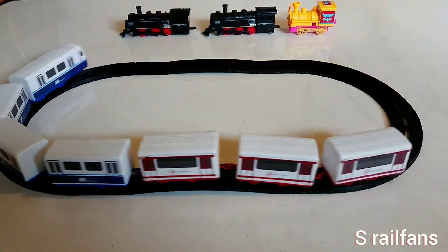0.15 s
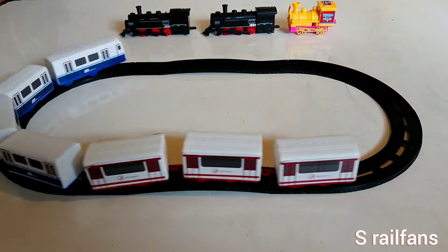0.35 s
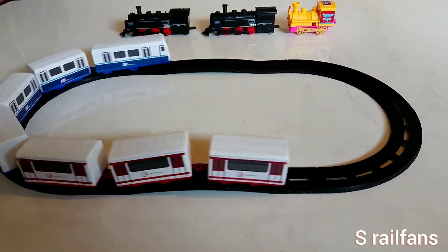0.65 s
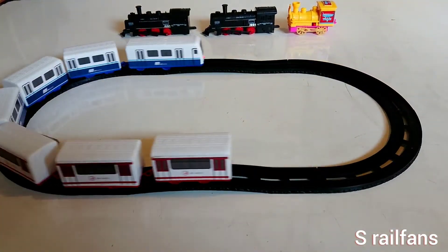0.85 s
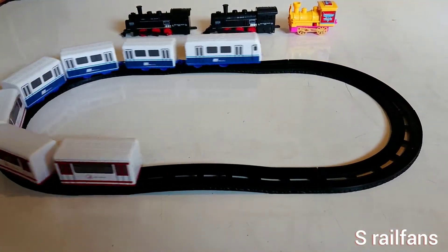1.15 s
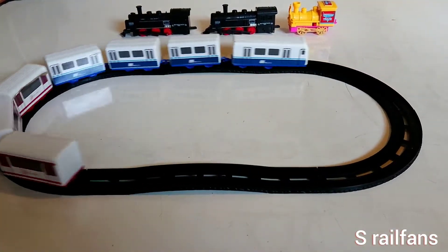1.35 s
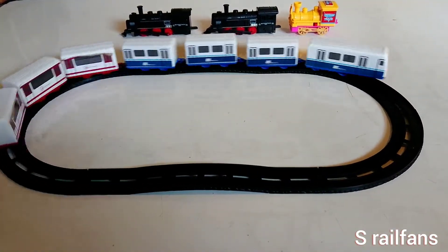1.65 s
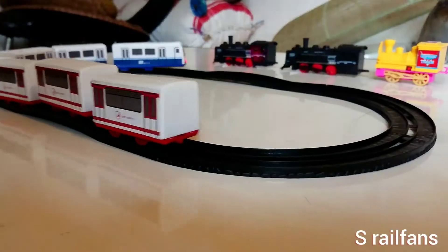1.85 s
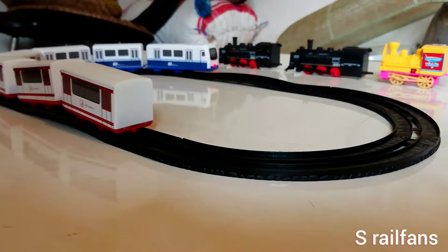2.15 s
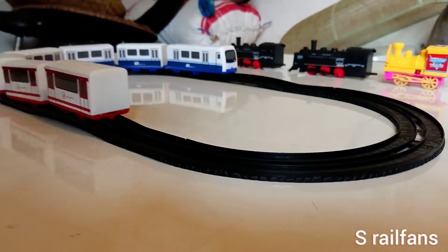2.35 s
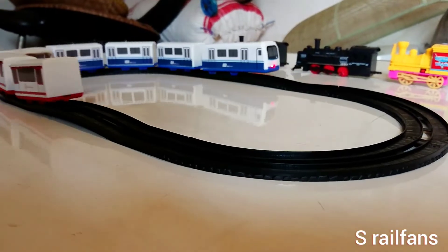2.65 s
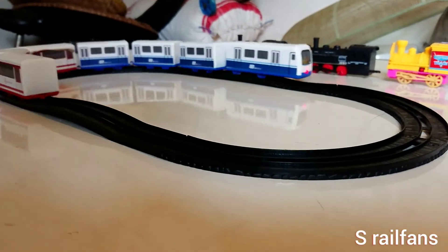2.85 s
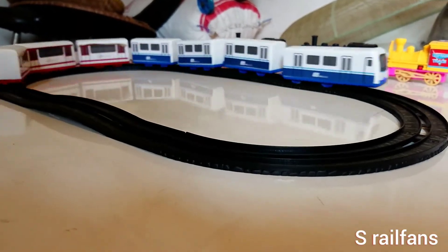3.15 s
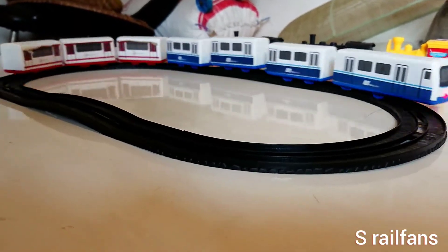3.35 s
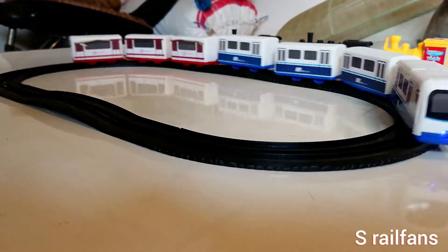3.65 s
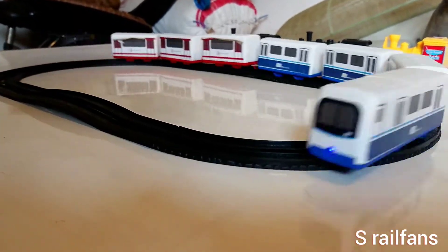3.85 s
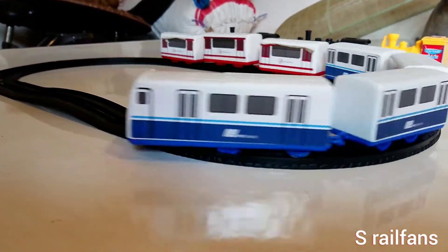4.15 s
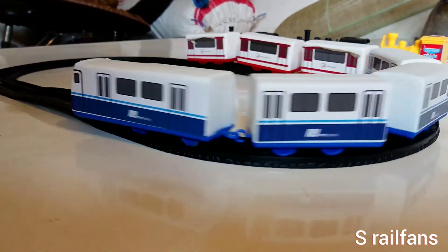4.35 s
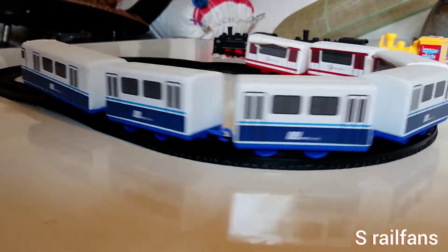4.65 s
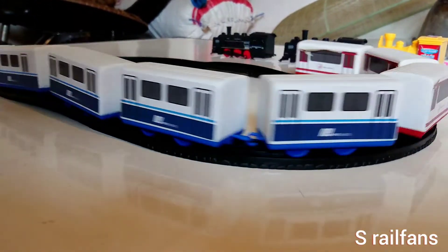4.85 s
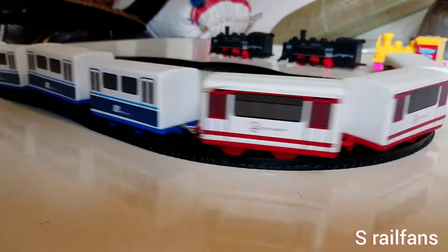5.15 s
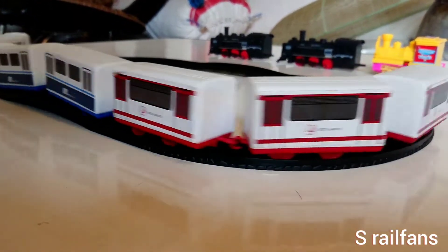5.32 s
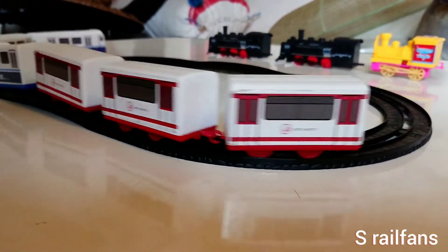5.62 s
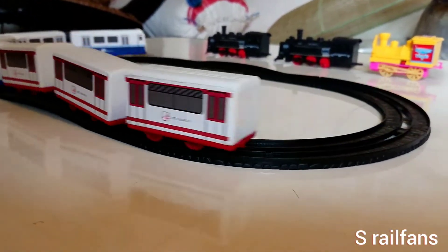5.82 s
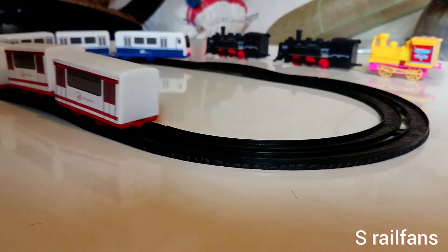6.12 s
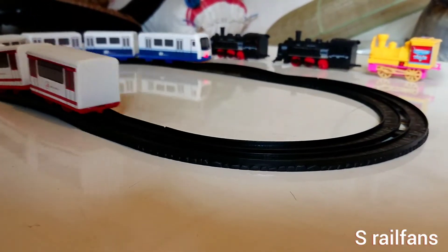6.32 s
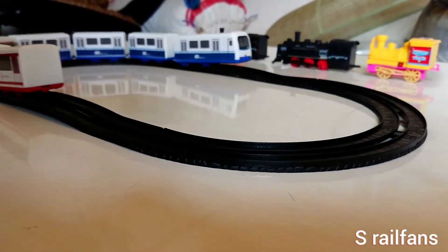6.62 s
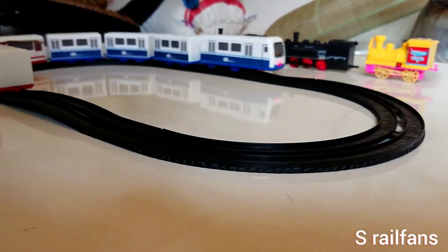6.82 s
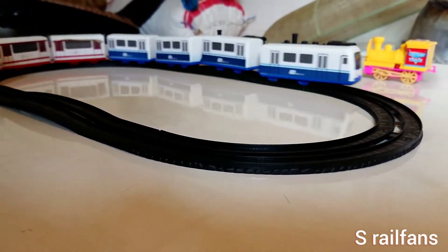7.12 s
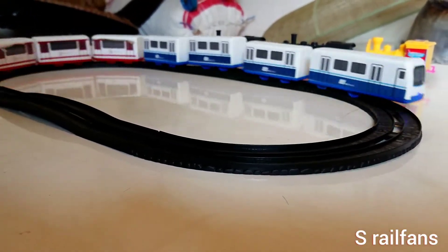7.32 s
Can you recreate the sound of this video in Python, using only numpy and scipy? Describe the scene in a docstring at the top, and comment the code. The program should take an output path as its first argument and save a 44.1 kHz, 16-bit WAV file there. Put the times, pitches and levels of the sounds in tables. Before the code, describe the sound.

A battery toy train runs without pause on a plastic track over a hard table. Dry wheel and gear chatter, hollow wagon-shell rattle and irregular joint clacks fill the foreground. After a blink-short dip near two seconds the colour changes and the table rumbles more; the clatter swells loudest around four seconds, eases, then returns at the end. Close stereo phone pickup, leaning right, quiet room with faint hum.

```python
"""Toy train on a hard table

A battery toy train runs on a plastic track, close to a phone with two microphone ports.
Filtered noise makes wheel and gear chatter, hollow shell ring, axle clacks over joints and table rumble;
damped sines add ticks and struck shell walls, wandering sines an appliance's hum over low room air.
The train is heard from above; at 1.72 s the level dips briefly, then the viewpoint is low: the chatter
has another colour and the table rumbles more.
"""
import sys
import numpy as np
from scipy import signal
from scipy.fft import rfft, irfft, next_fast_len
from scipy.io import wavfile
from scipy.ndimage import uniform_filter1d

SR = 44100
rng = np.random.default_rng(int(sys.argv[2]) if len(sys.argv) > 2 else 0)


def put_to_file(sound):
    """Save the sound as 16-bit audio at rate SR, in the file named by the first command-line argument."""
    columns = np.atleast_2d(sound).T  # one column per channel
    safe = np.clip(columns, -1, 1)
    whole_steps = np.round(safe * 32767)
    wavfile.write(sys.argv[1], SR, whole_steps.astype(np.int16))


def attenuation_scalar(level_db):
    """Turn a level in dB into a linear amplitude multiplier (20 dB per decade)."""
    decades = np.asarray(level_db, float) / 20
    return 10 ** decades


N = 329868
T = np.arange(N) / SR
M = next_fast_len(N)
HZ = np.maximum(np.arange(M // 2 + 1) * SR / M, 1)

# Table levels are relative: each source's function adds its own offset. Spectra give shape only.
# how near the train is heard: (time [s], shell ring [dB], wheel chatter [dB])
NEARNESS = [(0, -25.5, -31.5), (.13, -27, -32), (.22, -27.5, -32), (.35, -27.5, -29.5), (.5, -31, -38),
            (.75, -31.5, -38.5), (.95, -29.5, -35), (1.15, -31.5, -36), (1.3, -27.5, -34.5),
            (1.5, -28.5, -34.5), (1.7, -25.5, -33), (1.74, -31, -34), (1.85, -31, -32.5), (1.95, -35, -42),
            (2.3, -35, -42), (2.6, -32, -38), (2.97, -32.5, -36.5), (3.06, -29, -35.5), (3.2, -28.5, -37),
            (3.32, -26, -35), (3.45, -29.5, -35.5), (3.63, -24.5, -34.5), (3.76, -27, -34.5),
            (3.9, -25.5, -33.5), (4.3, -27, -33.5), (4.45, -24.5, -32), (5.1, -22.5, -31.5),
            (5.4, -25, -32), (5.95, -29.5, -35.5), (6.15, -32.5, -41), (6.45, -32, -38.5),
            (6.92, -31.5, -37.5), (7.03, -28.5, -35), (7.15, -30, -36), (7.36, -25.5, -33),
            (7.48, -31, -36)]
# axles over track joints and couplings knocking:
# (time [s], level [dB], shell ring against it [dB], sharpness [dB])
JOINT_CLACKS = [(0.093, -30, 1, -19), (0.1026, -28.5, 2, -3.5), (0.1486, -20.5, -8, -5),
                (0.232, -39, 4, -12), (0.268, -14.5, 1, -6), (0.307, -24.5, -4, -4), (0.335, -33, -5, -5),
                (0.3521, -24, 2, -6), (0.4364, -33, -4, -5), (0.4544, -23.5, -12, -6.5),
                (0.544, -25, 6, -7), (0.699, -21, 12, -13), (0.91, -18, -2, -17), (0.9368, -20, -6, -13),
                (0.954, -29.5, -8, -4.5), (1.0221, -29, -1, -6), (1.05, -19, 1, -19), (1.0825, -32, 8, -15),
                (1.103, -38, 6, -15), (1.2414, -28, 10, -6), (1.32, -18, 6, -8.5), (1.389, -36, 5, -17),
                (1.5, -22, 15, -19), (1.5405, -25, 3, -6.5), (1.572, -20, 1, -13), (1.7854, -13, 3, -9),
                (1.792, -18, 0, -10), (1.8254, -14, 1, -6.5), (1.829, -21, 0, -9), (2.001, -14, -5, -8.5),
                (2.095, -16.5, 10, -14), (2.1036, -13, -10, -12), (2.117, -17, -11, -8.5),
                (2.134, -16, 3, -11), (2.177, -15, -5, -12), (2.185, -16.5, -14, -8),
                (2.5576, -21, -6, -16), (2.583, -18, -9, -13), (2.613, -23, -6, -9), (2.627, -14, -1, -13),
                (2.6463, -19, -12, -19), (2.696, -16, -4, -11), (2.731, -21, 1, -21),
                (2.762, -23.5, 7, -14), (2.7916, -9, -8, -9.5), (3.005, -12.5, -3, -12),
                (3.026, -22, -4, -6.5), (3.0344, -22, -3, -9), (3.047, -17.5, 7, -8.5),
                (3.092, -19.5, 0, -6.5), (3.1, -30, 6, -11), (3.128, -43, 0, -19), (3.185, -16, -4, -11),
                (3.189, -29, 6, -14), (3.214, -27, -1, -8), (3.3, -12, -12, -9.5), (3.308, -19, 0, -13),
                (3.341, -25, 2, -13), (3.354, -20, 9, -7.5), (3.381, -20, 10, -11), (3.426, -26, 5, -11),
                (3.459, -17, -4, -19), (3.506, -15, -16, -11), (3.596, -19, 11, -22), (3.67, -17, -7, -8.5),
                (3.695, -19, 3, -7.5), (3.703, -24, -9, -6), (3.7495, -16.5, 10, -10),
                (3.809, -19, 15, -17), (3.8252, -10.5, 0, -6), (3.8732, -9.5, 3, -7.5),
                (3.878, -14.5, 5, -7), (3.923, -18.5, 10, -8), (3.967, -9.5, -7, -12), (4.0162, -19, 5, -7),
                (4.047, -10.5, -15, -9.5), (4.057, -12, -16, -10), (4.136, -3.5, -14, -14),
                (4.151, -9, -8, -12), (4.241, -7, 0, -20), (4.2575, -16.5, 10, -11), (4.278, -20, -8, -7.5),
                (4.31, -10, -19, -10.5), (4.346, -24, -5, -4.5), (4.375, -27, -7, -10),
                (4.396, -23, 10, -11), (4.412, -26, 12, -11), (4.4834, -9.5, -13, -13),
                (4.615, -36, 17, -15), (4.756, -21, 3, -9), (4.768, -22, -4, -17), (4.783, -13, 8, -21),
                (4.849, -27, 9, -11), (4.8686, -15, 2, -9), (4.883, -24, 8, -11), (4.903, -25, 12, -13),
                (4.918, -20, 9, -12), (4.9423, -28, -7, -4), (5.0973, -26, -10, -6.5),
                (5.135, -23, 15, -6.5), (5.1612, -19.5, 10, -6.5), (5.274, -21, -15, -7),
                (5.3303, -16, 3, -13), (5.4584, -12, -19, -14), (5.472, -33, 2, -15), (5.504, -40, 3, -19),
                (5.589, -40, 9, -18), (5.645, -26, 2, -13), (5.67, -28, -6, -5.5), (5.8756, -20, 6, -6.5),
                (5.933, -20, -3, -7.5), (5.975, -18, -5, -9), (6.1635, -22, 11, -10),
                (6.2704, -30, -7, -7.5), (6.448, -32, 11, -9), (6.516, -30, 7, -12), (6.595, -21, -1, -17),
                (6.649, -14.5, -3, -16), (6.7151, -22, -4, -12), (6.7478, -18, 3, -14),
                (6.8123, -17.5, 5, -13), (6.843, -18.5, 10, -10), (6.8883, -15, -5, -10),
                (7.042, -29, 12, -15), (7.1449, -7.5, -2, -8), (7.1515, -22, -6, -11), (7.21, -25, 1, -7.5),
                (7.23, -22, -12, -5.5), (7.237, -21, -2, -7), (7.2535, -27, -3, -9),
                (7.2616, -6, -13, -11.5), (7.293, -18, 3, -13), (7.417, -27, 2, -24)]
# hollow wagon shell resonances: (frequency [Hz], width [Hz], level [dB])
SHELL_MODES = [(852, 82, -8.5), (1009, 92, -2), (1100, 123, 0.5), (1183, 75, -3), (1283, 88, -6.5),
               (1390, 50, -16)]
# wheels and gears on plastic rails, from the low viewpoint: (frequency [Hz], density [dB per Hz])
CHATTER_LOW = [(880, -17), (1500, 0), (1760, -0.5), (2010, 3), (2300, -1.5), (2550, -2), (3130, -7.5),
               (3550, -7.5), (4200, -12.5), (4750, -18.5), (5880, -15.5), (7410, -22.5), (10200, -28),
               (12500, -40), (16200, -74), (22000, -120)]
# the same from above: (frequency [Hz], density [dB per Hz])
CHATTER_HIGH = [(880, -17), (1500, -1.5), (1610, -1), (1890, 3), (2470, -6), (2890, -11.5), (3390, -11),
                (3710, -13.5), (4310, -15.5), (5430, -21.5), (6480, -20), (8610, -27.5), (10400, -32.5),
                (12500, -45.5), (16200, -77), (22000, -120)]
# borders between the ranges of axles, couplings, gear teeth and their finest ticks: (frequency [Hz])
RANGE_BORDERS_HZ = [2600., 5200., 8000.]
# what a clack gives each of those four ranges: (level [dB], slope [dB per dB of sharpness])
CLACK_SHARES = [(-15, -0.44), (-14.5, 0.5), (-7.5, 3), (-19, -1)]
# the axles' range against the rest of the chatter: (time [s], level [dB])
AXLE_LEVEL = [(0, 0), (.3, -2.5), (.6, 0), (.95, -0.5), (1.3, 0), (1.7, 3), (1.8, -3.5), (2.3, 1),
              (2.7, -2.5), (3.1, 1.5), (3.6, 0), (4.1, -2), (4.6, 0), (5.1, 1), (5.6, -1), (6.1, -1),
              (6.6, -1), (7, -0.5), (7.48, 0.5)]
# shell walls struck hard enough to stand out: (time [s], peak level [dB], pitch [Hz])
WALL_POCKS = [(0.0958, -16, 1040), (0.104, -18.0, 1300), (0.398, -18.5, 1140), (0.5606, -21, 1050),
              (0.5928, -22, 1210), (0.7529, -21.0, 1100), (0.8506, -23, 1150), (0.896, -23, 1180),
              (0.9181, -18.0, 1180), (0.9413, -23, 1150), (0.9589, -19, 1150), (0.969, -20, 1130),
              (1.0157, -17, 1190), (1.0493, -19.0, 1160), (1.085, -20, 1140), (1.2487, -17.0, 1170),
              (1.3211, -15.5, 1140), (1.5024, -16.5, 1110), (1.5805, -15, 1170), (1.6465, -16.0, 1090),
              (1.6634, -22, 1090), (1.7035, -24, 1190), (1.709, -18, 1250), (1.786, -19.0, 1160),
              (1.8314, -15.5, 1200), (1.997, -25, 1140), (2.005, -17, 1190), (2.0156, -22, 1070),
              (2.0988, -25, 1140), (2.1374, -16.5, 1200), (2.1853, -23.5, 1220), (2.252, -26, 1160),
              (2.2954, -27, 1100), (2.4454, -19, 1020), (2.5146, -20, 1200), (2.5676, -15, 1260),
              (2.629, -22, 1270), (2.6559, -19, 1280), (2.6975, -15.5, 1170), (2.7319, -17, 1370),
              (2.738, -25, 1090), (2.7642, -15.5, 1210), (2.7915, -21.0, 1440), (2.8627, -18, 1240),
              (3.0043, -19, 1280), (3.024, -23, 1200), (3.0447, -16, 1290), (3.0512, -16, 1200),
              (3.1003, -17.0, 1210), (3.1922, -18, 1200), (3.3113, -17, 1190), (3.3415, -16.5, 1190),
              (3.3542, -16.5, 1280), (3.3835, -16.5, 1100), (3.4655, -14, 1270), (3.5209, -17.0, 1200),
              (3.5674, -13, 1200), (3.61, -13, 1040), (3.701, -8, 1220), (3.7505, -11.5, 1300),
              (3.827, -12, 1300), (3.8724, -14, 1120), (3.879, -7, 1280), (3.9237, -13, 1170),
              (3.968, -13, 1330), (4.0178, -14, 1020), (4.1379, -14.5, 1200), (4.154, -14, 1190),
              (4.2343, -14, 1170), (4.2494, -19, 1150), (4.26, -15.0, 1080), (4.3966, -15, 1170),
              (4.6177, -13, 1130), (4.7575, -19, 1140), (4.7797, -16, 1190), (4.798, -11, 1090),
              (4.884, -13, 1090), (4.9035, -16, 1040), (4.9207, -13.5, 1100), (4.927, -15, 1130),
              (5.0658, -14.0, 1200), (5.1369, -16, 1160), (5.1704, -16, 1090), (5.3872, -16, 1100),
              (5.3939, -15, 1130), (5.4727, -19, 1070), (5.5109, -19, 1110), (5.5893, -17.5, 1080),
              (5.6461, -17.0, 1110), (5.6609, -16, 1110), (5.8821, -17, 1100), (5.9148, -14, 1150),
              (6.0167, -23, 1170), (6.0328, -19.0, 1120), (6.0425, -20, 1070), (6.1032, -19.5, 1110),
              (6.1607, -21, 1060), (6.2069, -18, 1130), (6.3537, -20.5, 1100), (6.4474, -19.5, 1090),
              (6.5161, -23, 1180), (6.6007, -19, 1250), (6.6513, -21, 1300), (6.7158, -22, 1180),
              (6.7304, -25, 1150), (6.7493, -16, 1130), (6.7556, -21.0, 1130), (6.8184, -21, 1200),
              (6.8462, -18.0, 1120), (6.865, -22, 1140), (6.8862, -17, 1120), (7.008, -20, 1200),
              (7.043, -15, 1120), (7.148, -9.5, 1180), (7.1827, -14, 1210), (7.21, -16, 1190),
              (7.2333, -18.0, 1240), (7.2634, -13, 1380), (7.303, -14, 1190), (7.418, -13, 1400)]
# dull thuds through the table, Gaussian in time: (time [s], level [dB], standard deviation [s])
TABLE_THUDS = [(1.77, -39, 0.014), (1.825, -34, 0.0075), (1.865, -42, 0.0092)]
# table top spectrum: (frequency [Hz], density [dB per Hz])
TABLE_TOP = [(40, -34), (60, 2.5), (120, 6), (240, -1.5), (310, 0), (450, -5), (700, -5), (1000, -1.5),
             (2000, -61)]
# room background spectrum: (frequency [Hz], density [dB per Hz])
ROOM_AIR = [(28, -60), (38, -22), (55, 4), (90, 1.5), (200, -2), (400, -9.5), (1200, -28), (4000, -62)]
# appliance hum lines: (frequency [Hz], level [dB], wavering [dB])
HUM_LINES = [(93.5, -47, 1.5), (107.3, -42, 1.2), (146.5, -48.5, 1.5), (287, -56, 1.5)]
# swells of the throbbing line: (start [s], length [s], level [dB])
THROB_SWELLS = [(0.043, 0.099, -44), (0.294, 0.14, -37), (0.64, 0.074, -44.5), (0.87, 0.39, -46),
                (1.31, 0.071, -46), (1.797, 0.081, -40), (2.304, 0.15, -45), (2.674, 0.53, -41.5),
                (3.48, 0.036, -42), (3.57, 0.61, -42), (4.27, 0.25, -42), (4.618, 0.13, -51),
                (5.234, 0.25, -42.5), (5.616, 0.094, -46), (5.885, 0.097, -38), (6.07, 0.039, -43),
                (6.313, 0.16, -43), (6.573, 0.49, -44), (7.32, 0.18, -43)]
# likeness of the two ports, below 0 counting as 0: (frequency [Hz], likeness [0-1])
PORT_LIKENESS = [(60, 0.85), (130, 0.1), (290, 0.5), (640, 0.7), (1410, 0.13), (3100, -0.13), (5000, 0.2),
                 (7500, 0.9), (12000, 0.1)]
# left port minus right, on top of the pan: (frequency [Hz], difference [dB])
PORT_DIFFERENCE = [(60, 1), (200, 1), (1300, -0.5), (2400, 5.5), (4400, -2), (8000, 8.5), (12000, 6.5)]

# the right port lags, less and less above IN_STEP_HZ; pan is left minus right
PORT_LAG_MS, IN_STEP_HZ, PAN_DB = 0.2, 3360, -6.5
DIP_S, DIP_FADE_S = 1.721, 0.015
# table rumble against the wheel chatter, from the high and the low viewpoint
TABLE_HIGH_DB, TABLE_LOW_DB = -11.5, -5.5
AIR_DB, HUM_BLUR_RAD = -43.5, 0.35
THROB_HZ, THROB_REST_DB, SWELL_EDGE_S = 175.7, -50.5, 0.024
# knock: Gaussian standard deviation and lag; time constants of the rise into it and the settling after
KNOCK_WIDTH_MS, KNOCK_LAG_MS, RIDE_IN_S, SETTLE_S = 1.27, 1.55, 0.007, 0.0073
CLATTER_PER_S, USUAL_SHARP_DB = 490, -8.5
# the width is that of each of two passes
COUPLING_HZ, COUPLING_WIDTH_HZ, COUPLING_DB, COUPLING_PER_SHARP = 3740, 1460, -10, 4.2
ECHO_DB, ECHO_T60_S, ECHO_DELAY_MS, ECHO_HOLDS_S = -13, 0.11, 1.5, 0.25
SHELL_SWAY_DB = 1
# time constants of rise and decay, spread of the left port's pitch offset, added level
POCK_RISE_MS, POCK_DECAY_MS, POCK_APART_HZ, POCK_DB = 0.46, 1, 90, 1
# pitches lie evenly within PATTER_SPREAD_HZ either side; scatter is dB per neper of chance
PATTER_PER_S, PATTER_HZ, PATTER_SPREAD_HZ, PATTER_DB, PATTER_SCATTER_DB = 220, 1200, 240, 1, 1.5
TICKS_PER_S, TICK_LOW_HZ, TICK_HIGH_HZ = 200, 1700, 4520
TICK_DECAY_MS, TICK_DB, TICK_SCATTER_DB = 0.48, -1.5, 3
TOP_HZ = 13500


def on_log(table):
    """A (frequency, value) table read on every spectral bin, along log frequency."""
    hz, value = np.transpose(table)
    return np.interp(np.log(HZ), np.log(hz), value)


def unit(x):
    """Scale to rms 1."""
    return x / np.sqrt(np.mean(x ** 2))


def colour(x, gain):
    """Filter by a spectral gain scaled to keep the power of white noise."""
    return irfft(rfft(x, M) * gain / np.sqrt(np.mean(np.abs(gain) ** 2)), M)[..., :N]


def walk(rate):
    """Random levels held 1 / rate s and smoothed twice; spread near 1."""
    hold = int(SR / rate)
    steps = np.repeat(rng.standard_normal(N // hold + 1), hold)
    return 1.75 * uniform_filter1d(uniform_filter1d(steps, hold), hold)[:N]


def ports():
    """Noise at both ports: the right hears a share of the left slightly late, the rest by other paths."""
    left, other = rfft(rng.standard_normal((2, M)))
    like = np.sqrt(np.clip(on_log(PORT_LIKENESS), 0, 1))
    lag_s = PORT_LAG_MS / 1000 / (1 + (HZ / IN_STEP_HZ) ** 4)
    shared = like * left * np.exp(-2j * np.pi * HZ * lag_s)
    right = shared + np.sqrt(1 - like ** 2) * other
    return irfft(np.array([left, right]), M)[:, :N]


def rattle(per_s, spread_db, decay_ms, hiss):
    """Envelope of loose plastic parts: many ticks of uneven size over a steady rolling hiss."""
    sizes = attenuation_scalar(spread_db * np.minimum(rng.exponential(size=N), 4))
    hits = (rng.random(N) < per_s / SR) * sizes
    keep = np.exp(-1000 / (decay_ms * SR))
    return unit(unit(signal.filtfilt([1], [1, -keep], hits)) + hiss)


def tone(hz, db, blur_rad):
    """A sine whose phase wanders; standing waves shift it a little between the ports."""
    shift = np.array([[0], [1]]) * (0.24 + 0.27 * walk(2.09))
    phase = 2 * np.pi * hz * T + blur_rad * walk(9) + shift
    return attenuation_scalar(db) * np.sqrt(2) * np.sin(phase)


def damped_rings(times, levels_db, pitch_hz, decay_ms):
    """Short damped sines of either sign, each port hearing a slightly different pitch."""
    out, t_ms = np.zeros((2, N + 800)), np.arange(400) / SR * 1000
    shape = (1 - np.exp(-t_ms / POCK_RISE_MS)) * np.exp(-t_ms / decay_ms)
    shape = shape / shape.max()
    late_ms = np.array([[0], [PORT_LAG_MS]])
    chance = rng.standard_normal((len(times), 2))
    for s, db, hz, (sign, apart) in zip(times, levels_db, pitch_hz, chance):
        heard_hz = hz + POCK_APART_HZ * apart * np.array([[1], [0]])
        ring = np.sin(2 * np.pi * heard_hz * (t_ms - late_ms) / 1000)
        i = int(s * SR)
        out[:, i:i + len(t_ms)] += np.sign(sign) * attenuation_scalar(db) * shape * ring
    return out[:, :N]


def shells(contact, shell_db, loose):
    """Rolling and clacks drive the hollow shells' resonances, each swelling and fading alone."""
    struck_db = np.array([db + ring_db - 24.0 for _, db, ring_db, _ in JOINT_CLACKS])
    rolling = attenuation_scalar(shell_db + 0.1) * (loose + 1.465) / 3.15
    drive = contact * (rolling + knocks(struck_db, -3.0))
    modes = 0
    for hz, width, db in SHELL_MODES:
        resonance = signal.lfilter(*signal.iirpeak(hz, hz / width, SR), drive)
        modes = modes + attenuation_scalar(db + SHELL_SWAY_DB * walk(9)) * resonance
    # the shells radiate little outside their band
    skirt = 1j * HZ * 600.0 / (1153.0 ** 2 - HZ ** 2 + 1j * HZ * 700.0)
    power = sum(attenuation_scalar(2 * db) * np.pi * width / SR for _, width, db in SHELL_MODES)
    return colour(modes, skirt) * attenuation_scalar(-13.0) / np.sqrt(power)


def chatter(contact, level_db, loose):
    """Axles, couplings and gear teeth tick in their own ranges: shared jolts plus clusters of their own."""
    spectrum = 0
    above = [np.ones_like(HZ)] + [1 / (1 + (hz / HZ) ** 6) for hz in RANGE_BORDERS_HZ] + [0]
    for k, (share_db, slope) in enumerate(CLACK_SHARES):
        clack_db = [db + share_db + slope * (sharp_db - USUAL_SHARP_DB) for _, db, _, sharp_db in JOINT_CLACKS]
        own = rattle(450.0, 1.7, 0.31, 1.0) * attenuation_scalar(1.8 * walk(16))
        axle_db = np.interp(T, *np.transpose(AXLE_LEVEL)) if k == 0 else 0
        roll = attenuation_scalar(level_db + 1.33 + axle_db) * (0.5 * loose + 0.59 * own)
        drive = rfft(contact * (roll + knocks(clack_db, -15.0)), M)
        spectrum = spectrum + drive * np.sqrt(np.clip(above[k] - above[k + 1], 0, 1))
    views = [attenuation_scalar(on_log(view)) for view in (CHATTER_HIGH, CHATTER_LOW)]
    high, low = (irfft(spectrum * gain / np.sqrt(np.mean(gain ** 2)), M)[:, :N] for gain in views)
    return np.where(T < DIP_S, high, low)


def patter(shell_db):
    """Rolling wheels keep tapping the shells at random moments, following the shell level."""
    when, size, pitch = rng.random((int(PATTER_PER_S * N / SR), 3)).T
    times = when * N / SR
    levels_db = np.interp(times, T, shell_db) + PATTER_DB - PATTER_SCATTER_DB * np.log(size + 0.061)
    return damped_rings(times, levels_db, PATTER_HZ + PATTER_SPREAD_HZ * (2 * pitch - 1), POCK_DECAY_MS)


def ticks(chatter_db):
    """Small dry plastic ticks of wheels and gears, each a damped sine with its own pitch."""
    when, size, pitch = rng.random((int(TICKS_PER_S * N / SR), 3)).T
    times = when * N / SR
    levels_db = np.interp(times, T, chatter_db) + TICK_DB - TICK_SCATTER_DB * np.log(size + 0.04)
    pitch_hz = TICK_LOW_HZ * (TICK_HIGH_HZ / TICK_LOW_HZ) ** pitch
    return damped_rings(times, levels_db, pitch_hz, TICK_DECAY_MS)


def table_rumble(table_db):
    """Rolling and thuds shake the table top, which colours them low."""
    rolling = attenuation_scalar(table_db + 3.0) * rattle(60.0, 0.56, 22.0, 4.7)
    return colour(ports() * (rolling + thuds()), attenuation_scalar(on_log(TABLE_TOP)))


def room_air():
    """Low air noise of the room."""
    return attenuation_scalar(AIR_DB) * colour(ports(), attenuation_scalar(on_log(ROOM_AIR)))


def appliance_hum():
    """Steady hum lines of an appliance, each wavering in level."""
    return sum(tone(hz, db + waver_db * walk(6), HUM_BLUR_RAD) for hz, db, waver_db in HUM_LINES)


def throb():
    """One hum line that swells and fades unevenly over a resting level."""
    level = attenuation_scalar(THROB_REST_DB)
    for start, length, db in THROB_SWELLS:
        inside_s = np.minimum(T - start, start + length - T)
        level = level + attenuation_scalar(db) * np.clip(inside_s / SWELL_EDGE_S + 0.5, 0, 1)
    return level * tone(THROB_HZ, 0.35 * walk(5.7), 0.49)


def echoes(x):
    """Table, toys and near walls return a short dense noise tail, redrawn and crossfaded over time."""
    t, hop = np.arange(4000) / SR, int(ECHO_HOLDS_S * SR)
    shape = attenuation_scalar(-60 * t / ECHO_T60_S) * (t > ECHO_DELAY_MS / 1000)
    shape = shape * attenuation_scalar(ECHO_DB) / np.sqrt(np.sum(shape ** 2))
    window = np.sin(np.pi * np.arange(2 * hop) / (2 * hop))
    padded = np.pad(x, ((0, 0), (hop, 2 * hop)))
    out = np.pad(padded, ((0, 0), (0, len(t))))  # the direct sound stays
    for i in range(0, N + hop, hop):
        tail = rng.standard_normal(len(t)) * shape
        piece = padded[:, i:i + 2 * hop] * window
        out[:, i:i + 2 * hop + len(t) - 1] += signal.fftconvolve(piece, tail[None], axes=1)
    return out[:, hop:hop + N]


def knocks(levels_db, tail_db):
    """Clack envelope: a wheel rides into the joint, knocks, and the wagon settles amid loose ticks."""
    knock, loose = np.zeros((2, N))
    t = np.arange(-900, 1800) / SR
    hit = np.exp(-0.5 * (1000 * t / KNOCK_WIDTH_MS) ** 2)
    tail = attenuation_scalar(tail_db) * np.exp(-np.abs(t) / np.where(t < 0, RIDE_IN_S, SETTLE_S))
    for row, db in zip(JOINT_CLACKS, levels_db):
        i = int((row[0] + KNOCK_LAG_MS / 1000) * SR) - 900
        knock[i:i + len(t)] += attenuation_scalar(db) * hit[:N - i]
        loose[i:i + len(t)] += attenuation_scalar(db) * tail[:N - i]
    return knock + loose * rattle(CLATTER_PER_S, 2.2, 0.58, 0.8)


def couplings(contact):
    """Clacks clink in the couplings' own resonance, the sharper ones more."""
    clink_db = [db + COUPLING_DB + COUPLING_PER_SHARP * (sharp_db - USUAL_SHARP_DB)
                for _, db, _, sharp_db in JOINT_CLACKS]
    drive = contact * knocks(clink_db, -21.0)
    peak = signal.iirpeak(COUPLING_HZ, COUPLING_HZ / COUPLING_WIDTH_HZ, SR)
    return signal.lfilter(*peak, signal.lfilter(*peak, drive))


def pocks():
    """Shell walls struck hard ring briefly, as damped sines."""
    times, peak_db, pitch_hz = np.transpose(WALL_POCKS)
    return damped_rings(times, peak_db + POCK_DB, pitch_hz, POCK_DECAY_MS)


def thuds():
    """Envelope of the dull thuds that pass through the table."""
    return sum(attenuation_scalar(db) * np.exp(-0.5 * ((T - s) / width) ** 2) for s, db, width in TABLE_THUDS)


def train(shell_db, chatter_db, table_db):
    """The same contact noise rings the shells and chatters in the treble; the table rumbles below."""
    contact = ports()
    loose = rattle(300.0, 3.8, 0.92, 2.5) * attenuation_scalar(0.98 * walk(14))
    rolling = shells(contact, shell_db, loose) + chatter(contact, chatter_db, loose)
    small_hits = patter(shell_db) + ticks(chatter_db) + pocks()
    return echoes(rolling + small_hits + couplings(contact)) + table_rumble(table_db)


def room():
    """Room air, appliance hum and the throbbing line."""
    return room_air() + appliance_hum() + throb()


def scene():
    """Train and room at both ports, from the high and then the low viewpoint, with a brief dip between."""
    s, *columns = np.transpose(NEARNESS)
    shell_db, chatter_db = (np.interp(T, s, column) for column in columns)
    table_db = chatter_db + np.where(T < DIP_S, TABLE_HIGH_DB, TABLE_LOW_DB)
    pan = attenuation_scalar(np.array([[PAN_DB], [-PAN_DB]]) / 2)
    sound = (train(shell_db, chatter_db, table_db) + room()) * pan
    sound[1] = irfft(rfft(sound[1], M) * attenuation_scalar(-on_log(PORT_DIFFERENCE)), M)[:N]
    # sudden drop, then a squared rise
    dip = np.where(T < DIP_S, 1, np.clip((T - DIP_S) / DIP_FADE_S, 0.05, 1) ** 2.0)
    return sound * dip


def top_cut(x):
    """Nothing passes above the cut-off."""
    return signal.sosfilt(signal.butter(12, 15800, fs=SR, output="sos"), x)


def record(dry):
    """The phone's microphone path cuts the top treble with a steep low-pass."""
    low_pass = signal.butter(8, TOP_HZ, fs=SR, output="sos")
    mix = signal.sosfilt(low_pass, dry)
    return top_cut(mix)


dry = scene()
out = record(dry)
put_to_file(out)
```